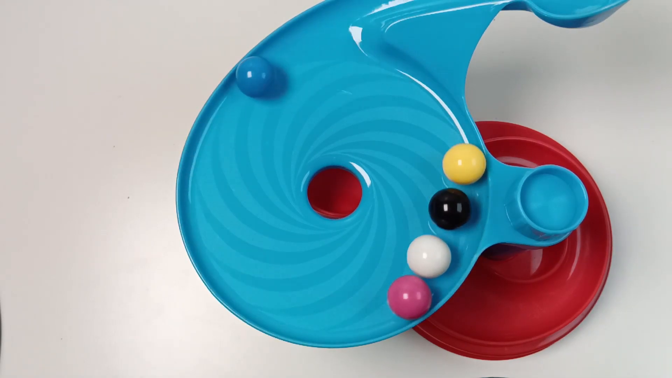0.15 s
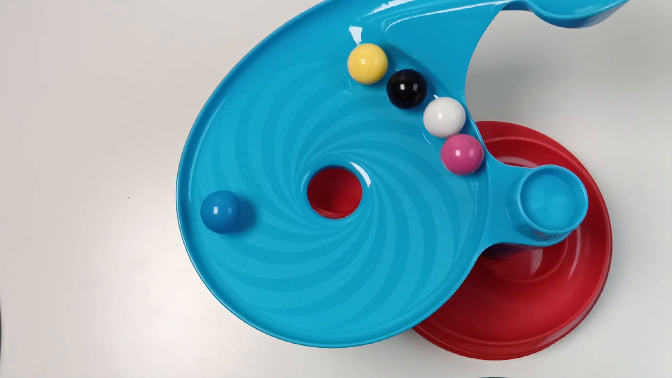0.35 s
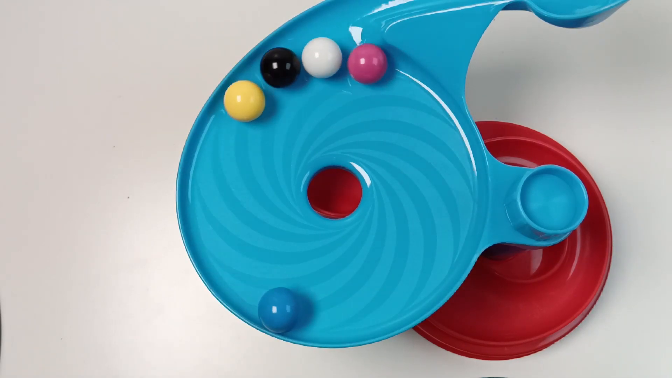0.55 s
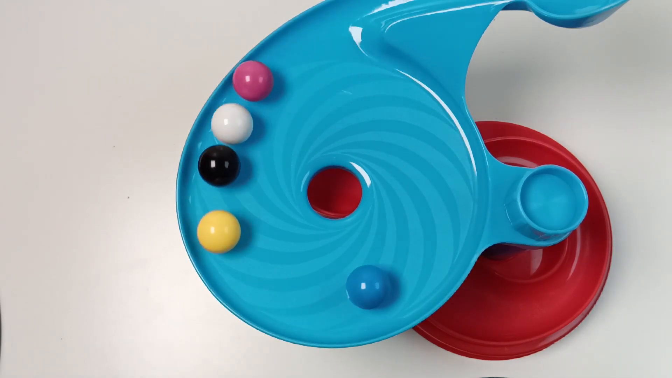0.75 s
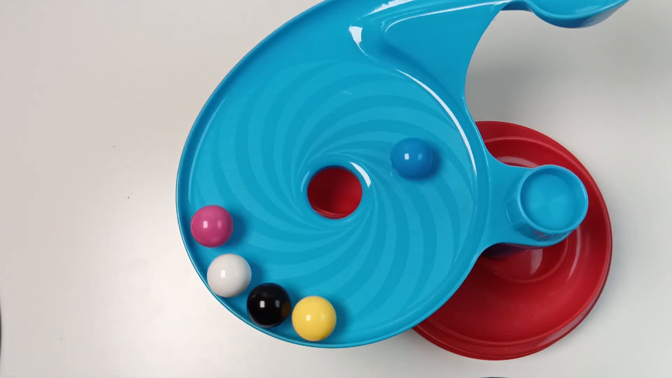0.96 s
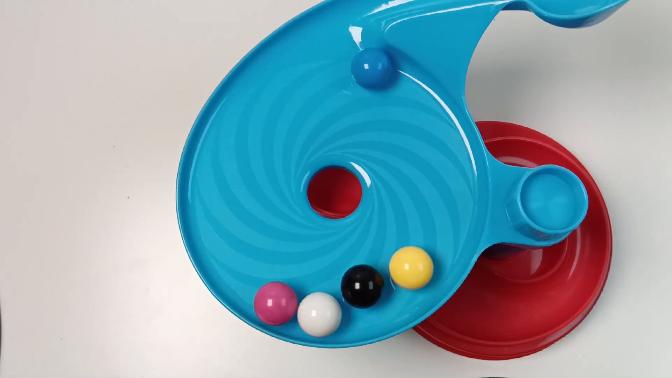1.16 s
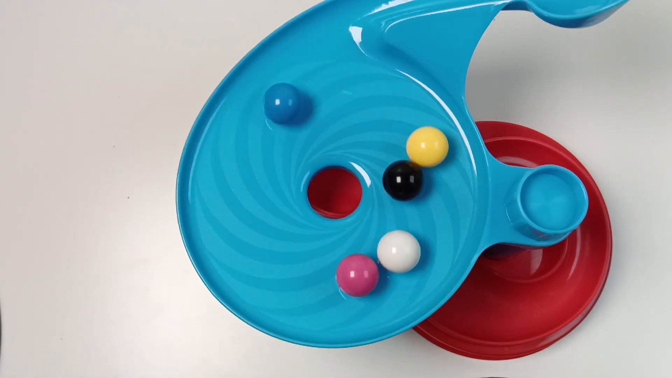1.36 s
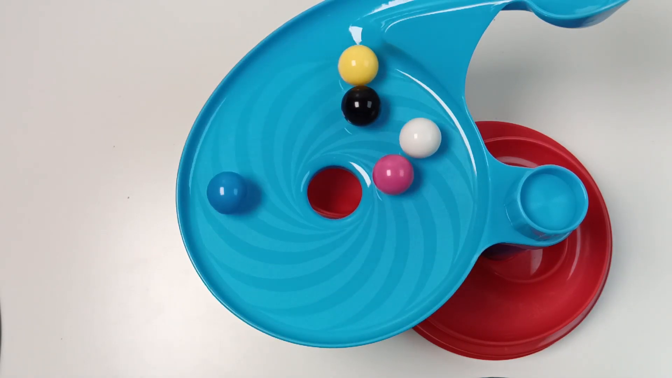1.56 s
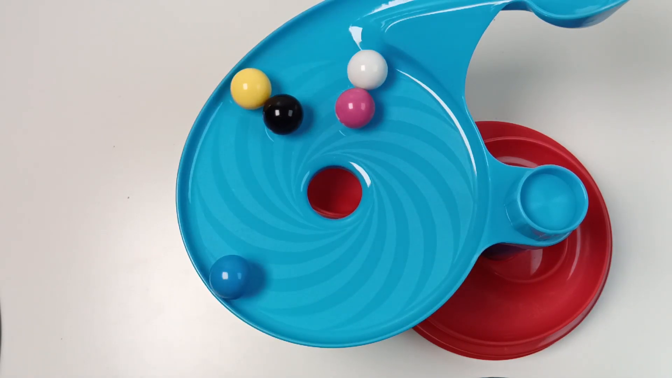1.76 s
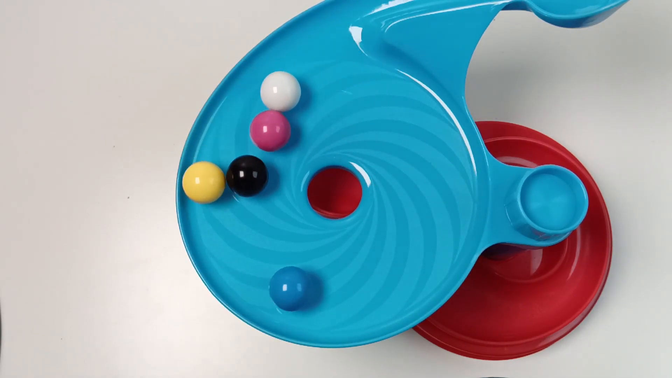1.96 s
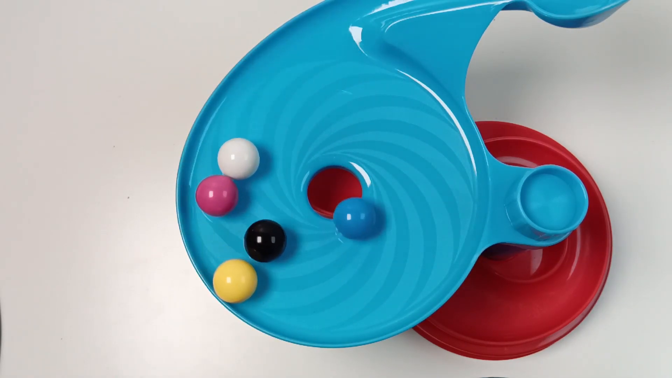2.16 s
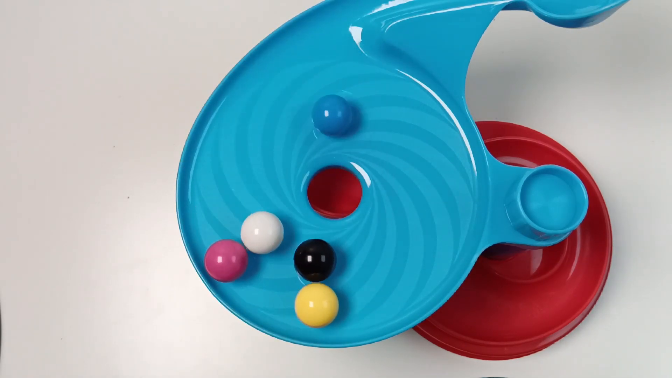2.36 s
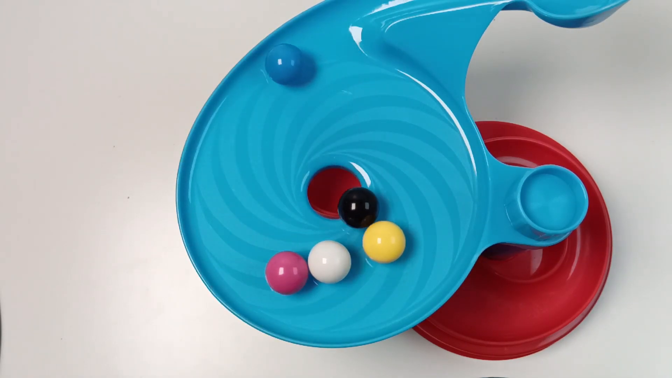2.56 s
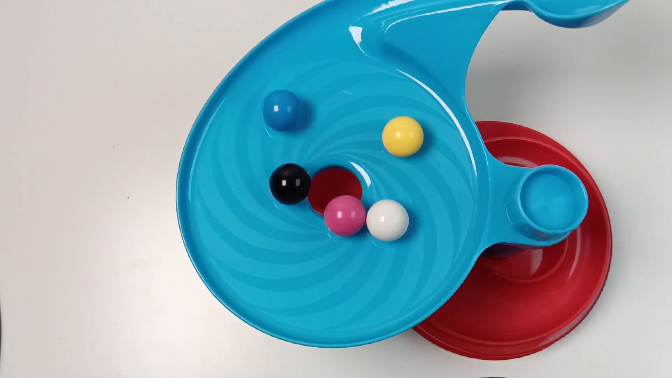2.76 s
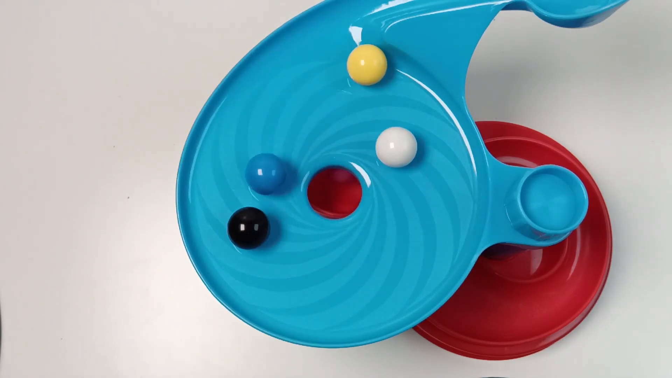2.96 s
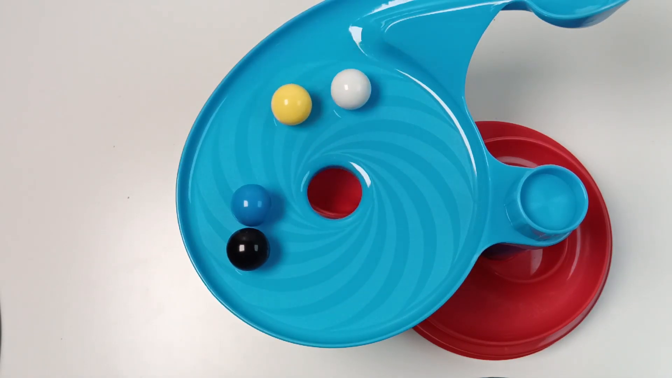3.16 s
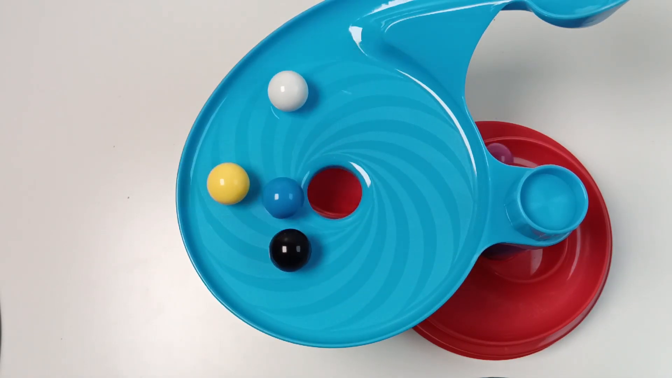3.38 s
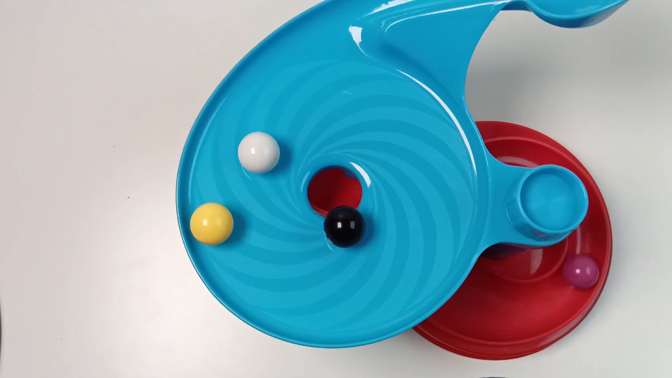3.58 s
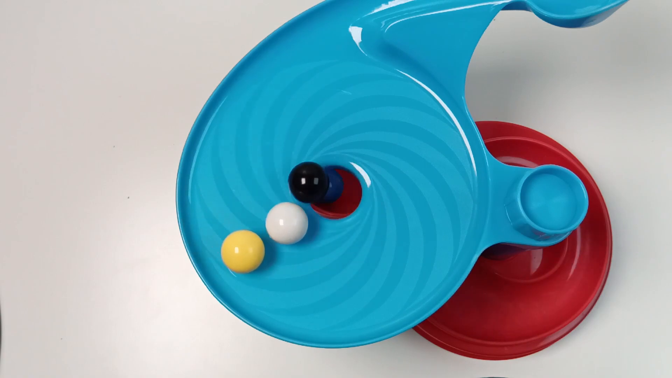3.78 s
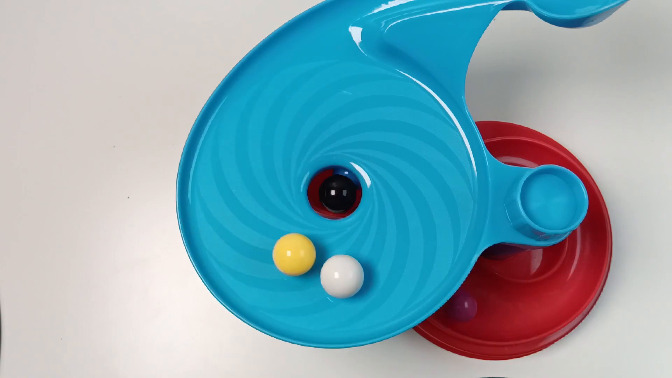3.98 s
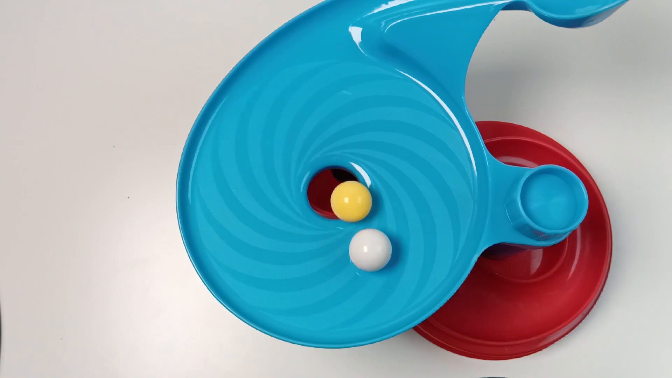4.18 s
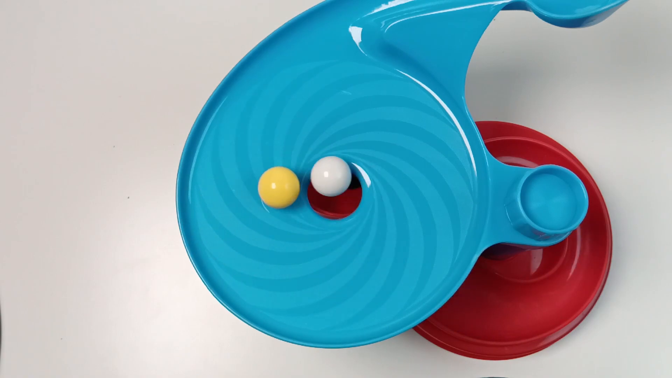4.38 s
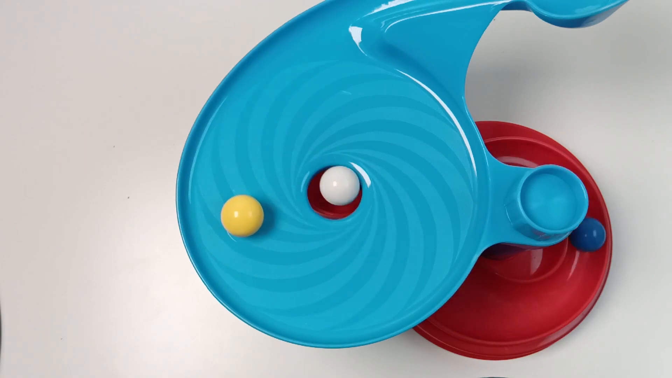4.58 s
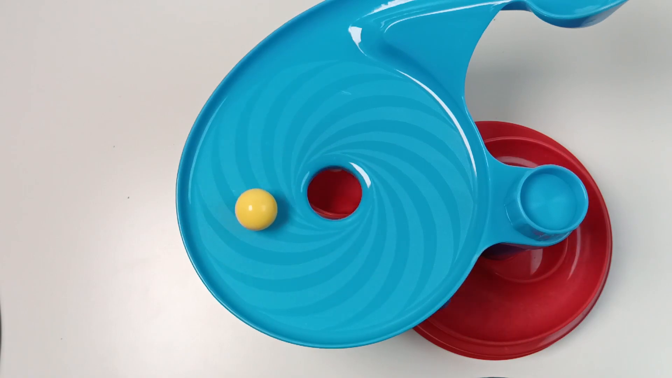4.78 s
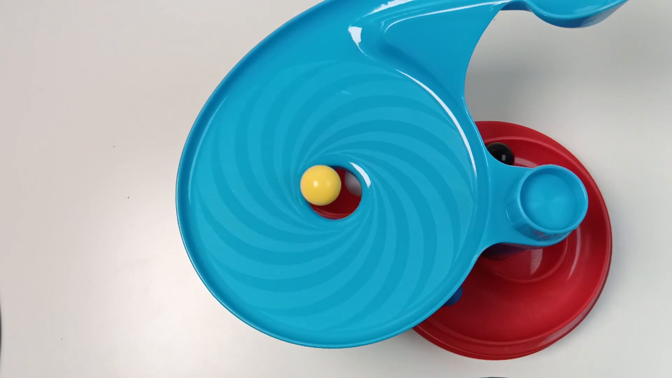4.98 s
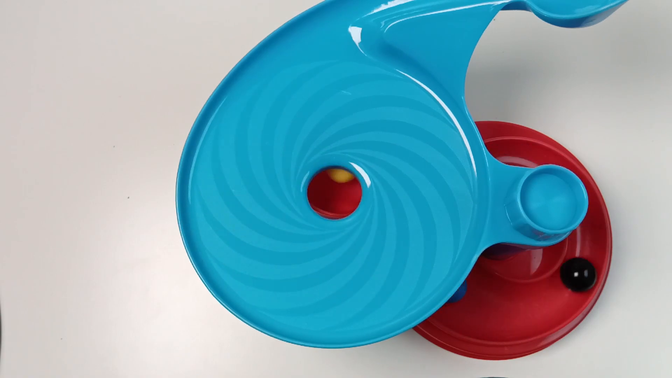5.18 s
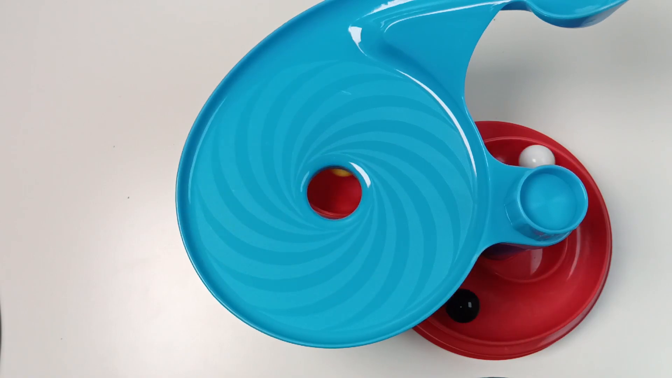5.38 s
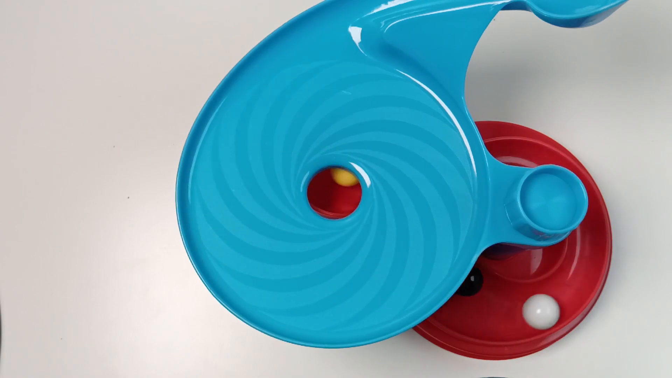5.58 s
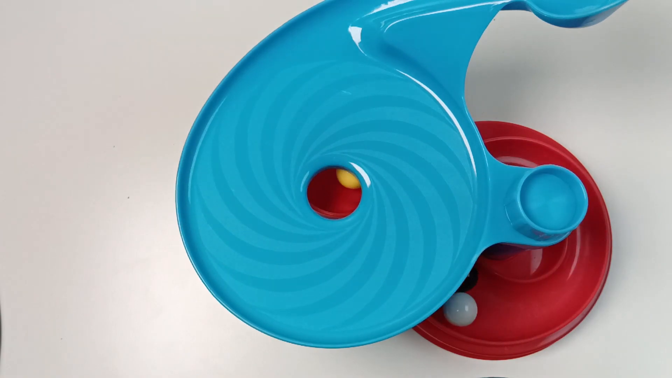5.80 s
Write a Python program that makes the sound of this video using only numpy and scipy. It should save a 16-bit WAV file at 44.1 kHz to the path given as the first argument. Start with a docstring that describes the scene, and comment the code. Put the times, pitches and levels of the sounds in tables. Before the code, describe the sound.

Quiet rolling and light ticks of plastic balls circling a funnel give way to bright, bursting clatters as they fall through into a dish.

```python
"""In a small room, plastic balls circle a plastic funnel, rumbling over its ribs and knocking together.
They drop through the centre hole and clatter down a hollow tower into a dish.
Blows are short bursts of shaped noise; the shell answers with dying noise, the tower with dying tones.
Rolling is a stream of tiny noise bursts, and sliding resonances make it sing.
A close pair of microphones hears all this over faint room tone."""
import sys
import numpy as np
from scipy import signal
from scipy.fft import rfft, irfft
from scipy.io import wavfile

SR = 44100
rng = np.random.default_rng(int(sys.argv[2]) if len(sys.argv) > 2 else 0)


def persist_wave(psi):
    """Save psi, clipped to +-1, as 16-bit WAV."""
    counts = np.round(np.clip(psi, -1, 1) * 32767).astype(np.int16)
    wavfile.write(sys.argv[1], SR, np.atleast_2d(counts).T)


N = 257544  # length in samples

# Levels in the tables are relative: each layer also has its own level setting.
# balls striking tower and dish: (time [s], level [dB], bass [dB], treble [dB], struck spot's resonance [Hz])
CLATTER = [(3.015, -27.5, -18.5, -14, 3930), (3.034, -30.5, 11, 5.5, 1820), (3.078, -22, 2.5, 7.5, 5320),
           (3.088, -26, 7.5, -1, 4800), (3.104, -34, 17, 15.5, 1240), (3.114, -29, -6.5, 11.5, 2730),
           (3.19, -31, 8, 2.5, 1290), (3.256, -44, -3.5, -16, 2620), (3.279, -20, -17.5, -8, 2650),
           (3.288, -24, 5.5, -3.5, 2830), (3.308, -32.5, 8, -2, 2220), (3.669, -22.5, 6, 5.5, 5170),
           (3.683, -20, 4, 5.5, 2760), (3.694, -29, 3, 16.5, 2520), (3.719, -31, 3, 5, 1270),
           (3.822, -33.5, -16, -10, 2710), (3.915, -37, -17, -8, 2110), (3.925, -31.5, -7, 0.5, 2220),
           (3.949, -39.5, -15, -18, 2010), (3.973, -29, -15.5, 1, 1840), (3.986, -33, 2, 1, 1880),
           (4.071, -23, 6, -1.5, 2050), (4.086, -24, 3.5, 16.5, 2780), (4.101, -33, 2, -16, 3000),
           (4.142, -22, -0.5, 7, 2140), (4.156, -33.5, -1, -16.5, 2250), (4.203, -33.5, 7, 6, 2800),
           (4.247, -27, 0.5, -2.5, 2670), (4.268, -24, 6.5, 3.5, 3920), (4.278, -33, 13, -1.5, 3330),
           (4.298, -26, -9, 1.5, 2090), (4.323, -28, 5.5, -5, 1980), (4.494, -48, 15.5, -29.5, 1210),
           (4.7, -51.5, 8.5, -25, 1260), (4.735, -25, 16.5, 6, 2220), (4.753, -27, 10, 10, 7060),
           (4.766, -29, -12, -0.5, 2660), (4.776, -33.5, 15, 4, 2530), (4.798, -24, -4.5, 1.5, 6650),
           (4.823, -23.5, -15, -6.5, 2170), (4.84, -28.5, 1.5, -9, 1205), (4.861, -28.5, 2.5, 2.5, 2910),
           (4.907, -37, -0.5, 9, 6300), (4.917, -21.5, -0.5, 12.5, 2580), (4.951, -30, -10.5, -13.5, 3350),
           (4.967, -23.5, -1, 1, 5340), (5.114, -33, -20, -20, 2740), (5.134, -39.5, -15, -25, 2450),
           (5.144, -40, 8.5, 6.5, 2560), (5.156, -21, -0.5, 10, 2700), (5.162, -27.5, -8, 14, 2810),
           (5.173, -26, 1, 2, 5100), (5.201, -26.5, -2, -4, 2820), (5.218, -27, -6, -3.5, 2560),
           (5.436, -25.5, 2.5, 13.5, 8480), (5.467, -30.5, 3.5, 3, 2030), (5.485, -26, 6.5, 3, 3500),
           (5.597, -38, -3, -3, 3200), (5.776, -29.5, -13.5, 14, 2150), (5.794, -26.5, 0.5, 20, 1935),
           (5.817, -25, 6, 7, 2120), (5.83, -28.5, 11, 6, 2450)]
# colour of a blow on the tower: (frequency [Hz], level [dB per Hz])
CLATTER_COLOUR = [(50, -41), (190, -36), (270, -28.5), (550, -6.5), (1050, -7), (1500, 1), (2200, 2),
                  (3000, 1), (4500, -10), (7000, -16.5), (10000, -25.5), (13500, -39.5), (15500, -29.5)]
# level of the top octave of the clatter: (time [s], level [dB])
CLATTER_TOP = [(3.1, 2), (3.7, 5.5), (4.1, -0.5), (4.9, 1.5), (5.2, -3), (5.8, -14)]
# ringing tones of the tower: (frequency [Hz], level [dB], time to fall 60 dB, before a cap [s])
TOWER_MODES = [(122.6, -23, 0.43), (171.3, -27.5, 0.6), (200.7, -20, 0.41), (525, -16.5, 0.33),
               (665.4, -3, 0.31), (749, -20.5, 0.91), (913, -11.5, 0.19), (1198, -6, 0.3),
               (1210, 1.5, 0.28), (1770, -34.5, 0.18), (2088, 8, 0.082), (2178, 3, 0.16), (2566, 0.5, 0.44),
               (2480, -23, .22), (2780, -11, 0.59), (3134, -2.5, 0.18), (4210, -4, 0.3), (4920, -1, 0.11),
               (6570, -7, 0.09)]
# strength of the tower's deepest tone: (time [s], level [dB])
DEEPEST_MODE = [(3.3, 2.5), (3.66, -10), (3.85, -9.5), (4.1, 3), (4.9, -1), (5.2, 3), (5.5, 7.5)]
# balls knocking together in the funnel:
# (time [s], level [dB], treble [dB], struck spot's resonance [Hz], rebound against the knock [dB])
KNOCKS = [(0.261, -50, 20.5, 2250, 5), (0.365, -50.5, 3, 1610, -16), (0.457, -48.5, 8, 9170, 6.5),
          (0.531, -47, 7, 3470, -19), (0.574, -46.5, 5.5, 5300, 5), (0.601, -41, 4.5, 5450, -20),
          (0.62, -37.5, -2, 5760, -23), (0.737, -44, -1, 1490, -17), (0.775, -38.5, 2, 1600, -9),
          (0.915, -33.5, 3, 1640, -4.5), (1.027, -36.5, 1, 1720, -5.5), (1.098, -43, -4, 1050, -9),
          (1.152, -41.5, -3, 3170, -3), (1.268, -37, 10.5, 3460, -3), (1.617, -31.5, 13, 3750, -2.5),
          (1.811, -30.5, 14.5, 7630, -7), (1.815, -32, 15, 1660, -1.5), (2.237, -51, -20, 1700, -20),
          (2.309, -49, -18, 1670, -19), (2.718, -62, 6, 6030, -20), (2.989, -48, 23, 6480, -18.5),
          (3.449, -53, 23, 6760, -15), (3.854, -49.5, 20.5, 8560, -7.5), (4.487, -46.5, -34, 3600, -15),
          (4.645, -43, -27, 3530, 0)]
# colour of a knock: (frequency [Hz], level [dB per Hz])
KNOCK_COLOUR = [(60, -33), (300, -26.5), (550, -15.5), (800, -10), (1250, -4.5), (1650, 0.5), (2100, -3.5),
                (2600, -9.5), (3400, -9), (5500, -17.5), (9500, -29), (13500, -47), (15500, -38.5)]
# dying ring of shell and room: (frequency [Hz], time to fall 60 dB, before stretching [s])
RING_TIME = [(100, 0.18), (400, 0.34), (1000, 0.17), (2700, 0.36), (7000, 0.25), (15000, 0.16)]
# share of a blow that rings on: (frequency [Hz], level [dB])
RING_COLOUR = [(100, 10), (1000, 5), (2500, -6), (5000, -4), (10000, -2.5), (15000, -11.5)]
# rolling in the funnel: (time [s], level [dB])
FUNNEL_ROLL = [(0.0, -53), (0.34, -54), (0.99, -58), (1.26, -59.5), (1.72, -56.5), (1.89, -61),
               (2.2, -60.5), (2.72, -64.5), (2.95, -53.5)]
# rolling in neck and dish: (time [s], level [dB])
NECK_ROLL = [(3.0, -44), (3.45, -59.5), (3.62, -46.5), (3.95, -51), (4.4, -59.5), (4.7, -54.5), (5.05, -63),
             (5.35, -52.5), (5.55, -70), (5.75, -51.5)]
# colours of the roar, the rumble, the fine grit and the dish: (frequency [Hz], level [dB per Hz])
ROAR_COLOUR = [(250, -28), (550, -7), (800, -9), (1150, -2.5), (1750, -4.5), (2150, -15), (3000, -31),
               (6000, -92.5), (12000, -71.5)]
RUMBLE_COLOUR = [(60, -28), (200, 2.5), (290, -0.5), (480, 1), (650, 3.5), (1000, -6.5), (3000, -13.5),
                 (9000, -79)]
GRIT_COLOUR = [(1200, -42), (2300, -3.5), (3100, 10), (4500, -3), (6000, -5), (9000, -17.5), (12000, -30),
               (16000, -49.5)]
DISH_COLOUR = [(100, -48), (300, -13.5), (600, -3), (780, -18.5), (920, -2), (1050, 1), (1210, 2),
               (1400, -5.5), (2200, -0.5), (3200, -19.5), (6000, -35), (12000, -55.5), (16000, -58.5)]
# singing resonances that slide with the ball's place:
# (start [s], end [s], start frequency [Hz], end frequency [Hz], level [dB])
GLIDES = [(-.05, 0.131, 1270, 1092, -46), (-.03, 0.202, 1560, 1496, -50), (0.198, 0.479, 570, 450, -52),
          (.68, 1.088, 1450, 1760, -48.5), (0.766, 1.008, 3000, 3060, -66.5), (1.802, 1.892, 740, 787, -48),
          (2.773, 2.96, 470, 660, -57.5), (3.89, 4.037, 1800, 2150, -44), (3.898, 4.05, 500, 486, -51),
          (4.354, 4.594, 1220, 1225, -50), (4.691, 4.754, 1650, 2020, -43.5)]
# a ball whirls in the neck: (end [s], level [dB])
WHIRLS = [(3.7, -53), (4.75, -48)]
# resonances of the neck as a whirl starts: (frequency [Hz], level [dB])
NECK_MODES = [(1250, 3), (942, -2), (2650, -14)]
# colour of the room tone: (frequency [Hz], level [dB per Hz])
AIR_COLOUR = [(25, -42), (70, 3), (130, -7), (200, 7), (300, -25), (1000, -2.5), (3000, -10.5),
              (7000, -25.5), (10000, -40.5), (13000, -29), (15500, -34.5)]
# left microphone against right: (frequency [Hz], level [dB])
LEFT_OVER_RIGHT = [(60, 2), (200, 0), (450, 8), (740, 4.5), (1220, 14), (2010, 4.5), (3330, 4.5), (5500, 2),
                   (9000, 1), (15000, 2.5)]
# how alike the two microphones hear: (frequency [Hz], likeness [0 to 1])
LIKENESS = [(30, 0.53), (100, 0.93), (600, 0.68), (1200, 0.36), (5000, 0.087), (15000, 0.11)]

# clatter: a strong blow is followed by a lighter, duller bounce after a random flight
CLATTER_SPOT_DB = 9  # height of the struck spot's resonance
BOUNCE_ABOVE_DB, BOUNCE_FLIGHT_S = -33, (.007, .018)
BOUNCE_DB, BOUNCE_BASS_DB, BOUNCE_TREBLE_DB = -13.5, 3.5, -11
TOP_HZ = 12000
# tower: a blow that favours the deepest mode drives the next ones less, by this share of the dB
DEEP_HZ, LOW_HZ, TRADE = 150, 300, 0.24
LONGEST_CYCLES = 480  # no mode takes more cycles than this to fall 60 dB
# knocks: thin, with one clear resonance that stands out more the lighter the touch (dB per dB)
KNOCK_BASS_DB, KNOCK_SPOT_DB = -3, 8.5
HARD_KNOCK_DB, PURITY = -32.5, 0.3
REBOUND_S, REBOUND_TREBLE_DB = .0098, -9.5  # the struck ball lands on the funnel again, duller
# rolling: the rumble swells once in each lap of the bunched balls, and each lap rumbles less
LAP_S, LAP_PEAK_S, LAP_SWELL_DB = 1.1, .33, 7  # swell is up and down from the middle
RUMBLE_FADE_DB_PER_S, GRIT_FADE_DB_PER_S = 2, 4  # both fade against the roar as the balls slow
RATTLE_DB, RATTLE_T60_S = -13, 0.28  # a blow leaves the ball rattling for a moment
WHIRL_S, WHIRL_SAG = .19, .09  # length, and share by which the neck's resonances sink
LEFT_LAG = 39  # samples by which the left microphone hears later
EDGE_HZ = 16100  # the recorder's upper limit


def clatter(level_db=2.0, ring_db=-3.5, modes_db=-12):
    """Falling balls strike the tower: a crack, a dense ring and the long tones of the hollow body."""
    rows = falls()
    cracks = blows(rows, CLATTER_COLOUR, crack_s=0.0015, even=0.67, spot_width=0.05)
    cracks = shaded(cracks)
    ringing = ring(cracks, stretch=1.0, rise_s=0.0004, patchy_db=4.5)
    modes = tower_modes(rows)
    return gain_of(level_db) * cracks, gain_of(ring_db) * ringing, gain_of(modes_db) * modes


def falls():
    """Each blow and any bounce: (time [s], level, bass and treble [dB], spot [Hz], spot height [dB])."""
    rows = []
    chances = rng.random(len(CLATTER))
    for (s, db, bass_db, treble_db, spot_hz), chance in zip(CLATTER, chances):
        rows.append((s, db, bass_db, treble_db, spot_hz, CLATTER_SPOT_DB))
        if db > BOUNCE_ABOVE_DB:
            landing = s + np.interp(chance, [0, 1], BOUNCE_FLIGHT_S)
            bounce_treble_db = treble_db + BOUNCE_TREBLE_DB
            rows.append((landing, db + BOUNCE_DB, BOUNCE_BASS_DB, bounce_treble_db, spot_hz,
                         CLATTER_SPOT_DB))
    return rows


def shaded(x):
    """The top octave of the blows brightens and dims, and is dullest as the last balls go down."""
    hz = np.fft.rfftfreq(N, 1 / SR)
    high_pass = 1 - 1 / (1 + (hz / TOP_HZ) ** 16)
    top = irfft(rfft(x) * high_pass, N)
    return x + (gain_of(along(CLATTER_TOP, 1)) - 1) * top


def tower_modes(rows, count=5, detune=0.01):
    """Each blow sets the modes of the hollow tower ringing, slightly shifted from blow to blow."""
    t, out = np.arange(SR) / SR, np.zeros((2, N))
    hz, db, t60 = np.transpose(TOWER_MODES)
    t60 = np.minimum(t60, LONGEST_CYCLES / hz)  # plastic damps high modes quickly
    rise = 1 - np.exp(-t / 0.0019)
    fade = gain_of(db[:, None] - 60 * t / t60[:, None]) * rise
    versions = []
    for shift in np.linspace(-detune, detune, count):
        angle = 2 * np.pi * hz[:, None] * (1 + shift) * t
        versions.append(np.vstack([fade * np.cos(angle), fade * np.sin(angle)]))
    for s, blow_db, bass_db, *_ in rows:
        turn = 2 * np.pi * rng.random((2, len(hz)))  # every blow lands on another spot
        deepest_db = np.interp(s, *np.transpose(DEEPEST_MODE))
        depth_db = deepest_db * np.where(hz < DEEP_HZ, 1, -TRADE * (hz < LOW_HZ))
        body_db = .5 * bass_db * ((hz > DEEP_HZ) & (hz < 1300))
        push = gain_of(blow_db + depth_db + body_db)
        mixture = np.hstack([push * np.cos(turn), push * np.sin(turn)])
        add(out, s, mixture @ versions[rng.integers(count)])
    return out


def knocks(level_db=-1, ring_db=-7):
    """Ball meets ball and rebounds, and the funnel under them answers."""
    rows = []
    for s, db, treble_db, spot_hz, rebound_db in KNOCKS:
        spot_db = KNOCK_SPOT_DB + PURITY * (HARD_KNOCK_DB - db)
        rows.append((s, db, KNOCK_BASS_DB, treble_db, spot_hz, spot_db))
        rebound_treble_db = treble_db + REBOUND_TREBLE_DB
        rows.append((s + REBOUND_S, db + rebound_db, KNOCK_BASS_DB, rebound_treble_db, spot_hz, 0))
    cracks = blows(rows, KNOCK_COLOUR, crack_s=0.0023, even=1.0, spot_width=0.095)
    ringing = ring(cracks, stretch=0.45, rise_s=0.00086, patchy_db=0.5)
    return gain_of(level_db) * cracks + gain_of(ring_db) * ringing


def blows(rows, colour, crack_s, even, spot_width, size=4096):
    """Each blow scatters through the thin shell as a crack of a few ms, coloured by the spot it lands on."""
    t, hz = np.arange(size) / SR, np.fft.rfftfreq(size, 1 / SR)
    bass = hz ** 2 / (hz ** 2 + 250 ** 2) / (1 + (hz / 1200) ** 4)
    treble = 1 - 1 / (1 + (hz / 4400) ** 4)
    middle = (hz > 1300) & (hz < 4500)
    out = np.zeros((2, N))
    for s, db, bass_db, treble_db, spot_hz, spot_db in rows:
        scatter = rfft(rng.standard_normal((2, size)) * t * np.exp(-t / crack_s))
        # make the random notches in the spectrum shallower
        scatter *= np.array([causal((evened(abs(z)) + 0.21) ** -min(even, 1)) for z in scatter])
        spot = np.exp(-((hz - spot_hz) / np.hypot(spot_width * spot_hz, 110)) ** 2)
        colour_db = read(colour, hz) + bass_db * bass + treble_db * treble + spot_db * spot
        crack = scatter * causal(gain_of(colour_db))
        # the level is that of the middle band over 6 ms
        crack /= np.sqrt((abs(crack[:, middle]) ** 2).sum(1, keepdims=True))
        add(out, s, gain_of(db) * irfft(crack) * np.sqrt(size * .006 * SR / 2))
    return out


def ring(x, stretch, rise_s, patchy_db, count=4):
    """Dense dying ring of shell and room; its stronger and weaker bands change as the balls move about."""
    out, clock = np.zeros((2, N)), np.arange(N) / SR
    for k in range(count):
        hz, t, noise = signal.stft(rng.standard_normal((2, SR // 2)), SR, nperseg=256)
        colour_db = read(RING_COLOUR, hz) + patchy_db * rng.standard_normal(len(hz))
        t60 = stretch * read(RING_TIME, hz)
        fade = gain_of(colour_db[:, None] - 60 * t / t60[:, None])
        tail = signal.istft(noise * fade, SR, nperseg=256)[1]
        tail *= 1 - np.exp(-np.arange(tail.shape[1]) / SR / rise_s)
        # the tails take turns, each swinging at its own pace
        share = np.cos(np.pi * (k + 1) * 2 * clock + k) * np.sqrt(2 / count)
        out += convolve(x * share, tail / np.linalg.norm(tail[0]))
    return out


def shell(x, ripple_db=3.5, spacing_hz=70):
    """The many close modes of the plastic favour some frequencies and swallow others."""
    hz = np.fft.rfftfreq(N, 1 / SR)
    heights = rng.standard_normal(2048)
    ripple = np.interp(hz / spacing_hz, np.arange(len(heights)), heights)
    return irfft(rfft(x) * evened(gain_of(ripple_db * ripple)), N)


def rolling(roar_db=3, rumble_db=-22, grit_db=-10, dish_db=0):
    """Rolling balls shake the ribbed funnel; later the neck and the dish take over."""
    t, roll_db = np.arange(N) / SR, along(FUNNEL_ROLL, 1)
    in_funnel = np.interp(t, [2.95, 3.05], [1, 0])
    lap_db = LAP_SWELL_DB * np.cos(2 * np.pi * (t - LAP_PEAK_S) / LAP_S)
    roar = coloured(bumps(per_s=250, spread_db=2.5), ROAR_COLOUR)
    rumble = coloured(bumps(per_s=3000, spread_db=0.0), RUMBLE_COLOUR)
    grit = coloured(bumps(per_s=690, spread_db=7.5), GRIT_COLOUR)
    funnel = gain_of(roll_db + roar_db) * roar
    funnel += gain_of(roll_db + lap_db - RUMBLE_FADE_DB_PER_S * t + rumble_db) * rumble
    funnel += gain_of(roll_db - GRIT_FADE_DB_PER_S * t + grit_db) * grit
    dish = gain_of(dish_db) * rattle() * coloured(bumps(per_s=330, spread_db=7), DISH_COLOUR)
    return in_funnel * funnel + (1 - in_funnel) * dish


def bumps(per_s, spread_db):
    """Tiny collisions of a rolling ball with the surface, each a short, dying burst."""
    size = gain_of(spread_db * np.minimum(rng.exponential(1, N), 4))
    hits = size * (rng.random(N) < per_s / SR)
    power = signal.lfilter([1], [1, -np.exp(-1 / (0.0063 * SR))], hits ** 2)
    return evened(np.sqrt(power) * rng.standard_normal((2, N)))


def rattle():
    """Strength of the rolling in neck and dish, stirred up for a moment by every blow."""
    kicks = np.zeros(N)
    for s, db, *_ in CLATTER:
        kicks[min(round(s * SR), N - 1)] += gain_of(db + RATTLE_DB) ** 2
    keep = gain_of(-60 / (RATTLE_T60_S * SR)) ** 2  # share of the power left after one sample
    stirred = signal.lfilter([1], [1, -keep], kicks)
    return np.sqrt(gain_of(along(NECK_ROLL, 1)) ** 2 + stirred)


def singing(level_db=0, width_hz=105):
    """The shaking of a rolling ball is caught by one narrow, sliding resonance, which swells and fades."""
    out, r = np.zeros((2, N)), np.exp(-np.pi * width_hz / SR)
    for start, end, start_hz, end_hz, db in GLIDES + whirls():
        u = np.linspace(0, 1, max(round((end - start) * SR), 2))  # 0 at the start, 1 at the end
        shake = rng.standard_normal((2, len(u))) + 1j * rng.standard_normal((2, len(u)))
        swing = signal.lfilter([1], np.poly([r, r]), shake)
        slide_hz = start_hz + (end_hz - start_hz) * u
        tone = evened((swing * np.exp(2j * np.pi * np.cumsum(slide_hz) / SR)).real)
        sound = gain_of(db + level_db) * tone * np.sin(np.pi * u)
        add(out, start, sound[:, max(-round(start * SR), 0):])  # skip what lies before time 0
    return out


def whirls():
    """A ball spins down the neck before it drops, and the resonances of the neck sink with it."""
    rows = []
    for end, db in WHIRLS:
        for hz, mode_db in NECK_MODES:
            rows.append((end - WHIRL_S, end, hz, hz * (1 - WHIRL_SAG), db + mode_db))
    return rows


def room_tone(level_db=-71):
    """Faint, steady noise of the room."""
    return gain_of(level_db) * coloured(rng.standard_normal((2, N)), AIR_COLOUR)


def microphones(pair, right_db=0):
    """Two microphones share part of the waves; the right one is nearer and can catch more direct treble."""
    hz = np.fft.rfftfreq(N, 1 / SR)
    a, b = rfft(pair)
    same = np.clip(read(LIKENESS, hz), 0, 1)
    tilt = gain_of(read(LEFT_OVER_RIGHT, hz) - right_db * hz ** 2 / (hz ** 2 + 4500 ** 2))
    both = np.array([a * tilt, same * a + np.sqrt(1 - same ** 2) * b])
    left, right = irfft(both * np.sqrt(2 / (1 + tilt ** 2)), N)
    return np.array([np.r_[np.zeros(LEFT_LAG), left[:-LEFT_LAG]], right])


def gain_of(db):
    """Turns decibels into an amplitude."""
    return 10 ** (np.asarray(db) / 20)


def evened(x):
    """Scales to an rms of 1."""
    return x / np.sqrt(np.mean(x ** 2) + 1e-20)


def read(points, hz):
    """Reads a table on a log-frequency axis."""
    f, value = np.transpose(points)
    return np.interp(np.log(hz + 1), np.log(f + 1), value)


def along(rows, column):
    """Draws a table column as a curve with a value at every sample."""
    rows = np.asarray(rows)
    return np.interp(np.arange(N) / SR, rows[:, 0], rows[:, column])


def add(mix, s, sound):
    """Adds a two-channel sound at time s, or at 0 if s is earlier."""
    part = mix[:, max(round(s * SR), 0):][:, :sound.shape[1]]
    part += sound[:, :part.shape[1]]


def coloured(x, colour):
    """Shapes the spectrum of x by a colour table, at an rms of 1."""
    hz = np.fft.rfftfreq(N, 1 / SR)
    return evened(irfft(rfft(x) * gain_of(read(colour, hz)), N))


def causal(gain):
    """The response with this magnitude that starts at once and then dies away."""
    log = np.log(np.maximum(np.r_[gain, gain[-2:0:-1]], 1e-5))
    return np.exp(np.conj(signal.hilbert(log)))[:len(gain)]


def convolve(x, response):
    """Filters each channel by its own response."""
    return signal.fftconvolve(x, response, axes=1)[:, :N]


def scene():
    """The toy over faint room tone; the bare cracks of the clatter are brighter on the right."""
    air = room_tone()
    cracks, ringing, modes = clatter()
    body = knocks() + shell(ringing + rolling()) + modes + singing()
    return microphones(cracks, right_db=7.5) + microphones(body + air)


def record(dry):
    """The recorder cuts off the highest frequencies."""
    low_pass = signal.firwin(255, EDGE_HZ, window=("kaiser", 9), fs=SR)
    return signal.oaconvolve(dry, low_pass[None], "same")


dry = scene()
out = record(dry)
persist_wave(out)
```